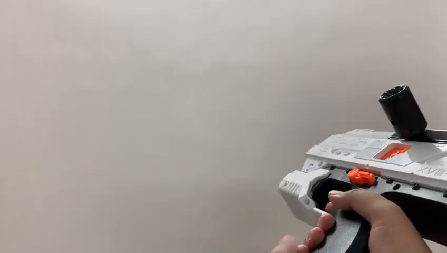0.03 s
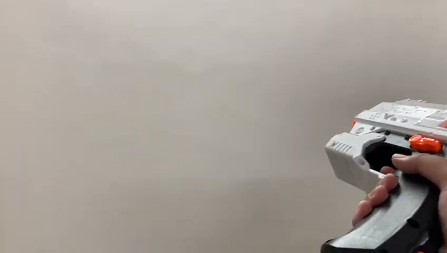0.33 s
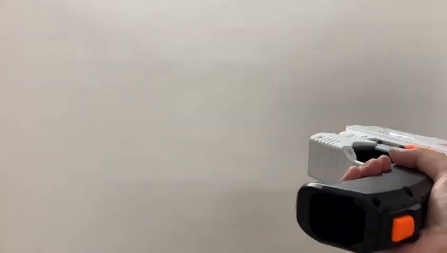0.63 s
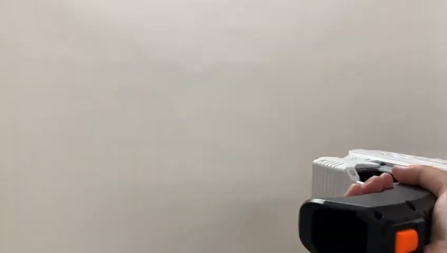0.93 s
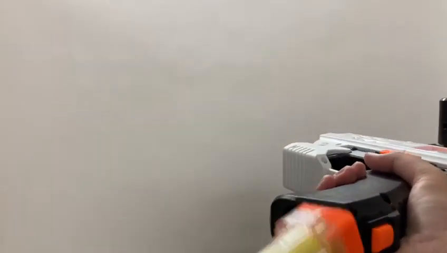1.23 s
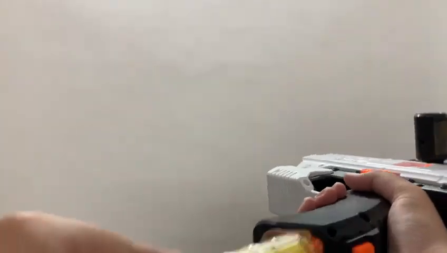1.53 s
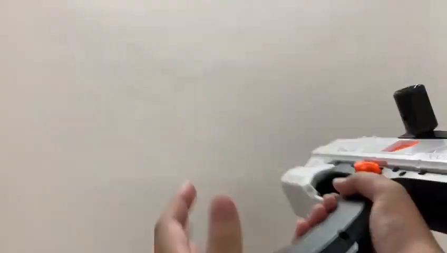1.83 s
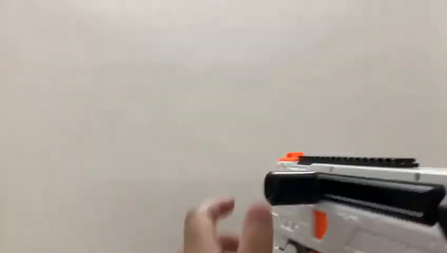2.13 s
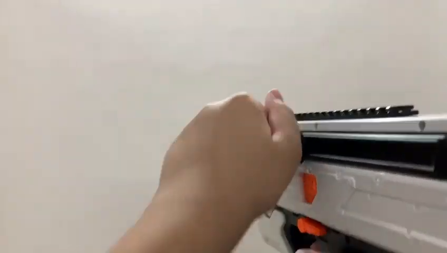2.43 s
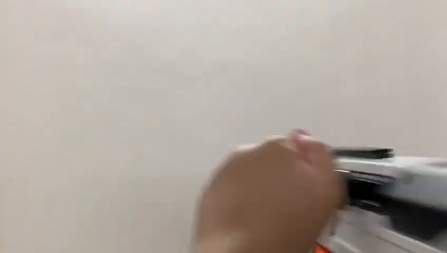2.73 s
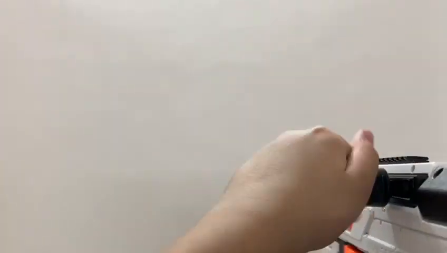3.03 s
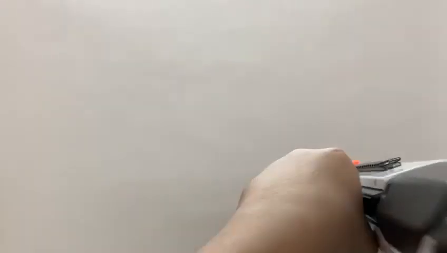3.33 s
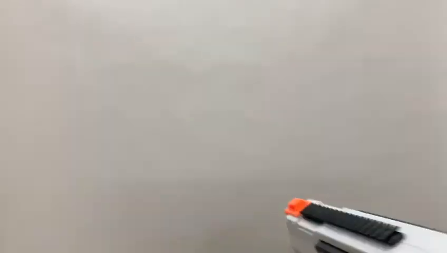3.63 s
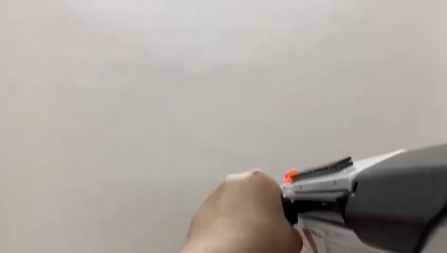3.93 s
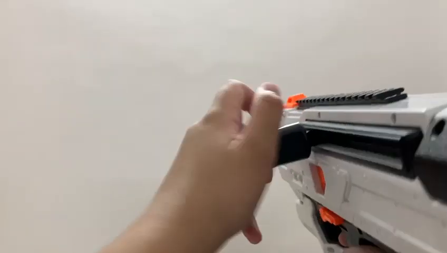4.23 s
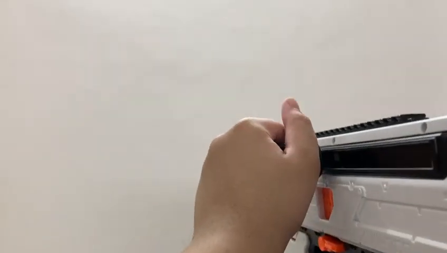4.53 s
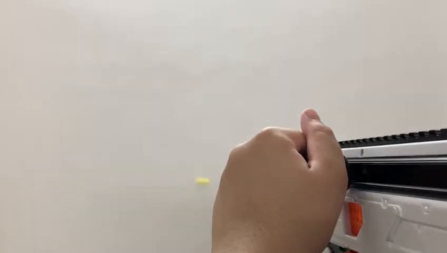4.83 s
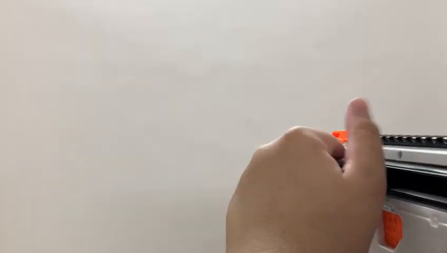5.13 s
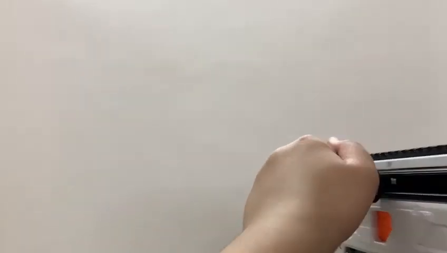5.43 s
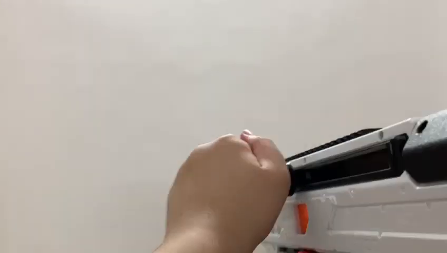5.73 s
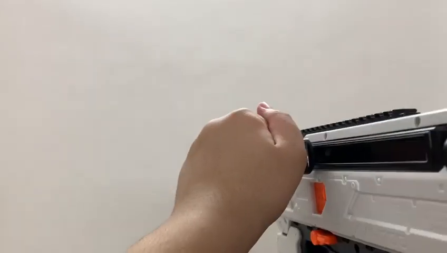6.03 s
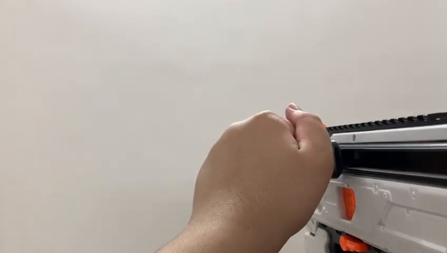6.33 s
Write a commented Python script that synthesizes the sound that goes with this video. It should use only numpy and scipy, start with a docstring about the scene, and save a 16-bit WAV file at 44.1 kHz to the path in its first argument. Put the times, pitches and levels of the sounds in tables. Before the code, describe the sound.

A plastic toy foam blaster is handled close to a phone microphone in a bare room. Its magazine creaks, clicks and clacks home, then the slide is racked back and forward with quick ratcheting snaps. The spring plunger fires with a loud thump, a puff of air and a short rattle. The slide is racked again and a second shot follows, over a faint ventilation rush.

```python
"""A plastic foam blaster is handled close to a phone in a bare, ventilated room. First a magazine creaks
by stick-slip and clacks home; then the slide is racked over its ratchet. At 4.9 s the spring plunger
fires with a thump, a burst of air and a rattle; the slide is racked again, and it fires again at 6.1 s.
Every contact excites the modes of the hollow shell and then the room; the phone's limiter ducks on
the loud clacks and lifts the reverberation as it lets go."""
import sys
import numpy as np
from scipy import signal
from scipy.fft import rfft, irfft
from scipy.io import wavfile
from scipy.ndimage import uniform_filter1d, minimum_filter1d

SR = 44100
rng = np.random.default_rng(int(sys.argv[2]) if len(sys.argv) > 2 else 0)


def to_wav(s):
    """Save 16-bit WAV."""
    ch = np.atleast_2d(s).T  # columns
    pcm = np.round(np.clip(ch, -1, 1) * 32767)  # PCM
    wavfile.write(sys.argv[1], SR, pcm.astype(np.int16))


N = 285768
T = np.arange(N) / SR

# dense modal response of the shell: f/Hz, level/dB, t60/s
SHELL_BANDS = [(60, -11, 0.1), (196, -7, 0.056), (450, 3, 0.067), (670, 4, 0.044), (1076, 3.5, 0.049),
               (1950, 1, 0.047), (3700, 0.5, 0.042), (5840, -1.5, 0.029), (9300, -3, 0.058),
               (12000, -0.5, 0.03)]
# the hard first instant of a click: f/Hz, level/dB, t60/s
CRACK_BANDS = [(500, -17.5, .01), (1500, -8, 0.021), (3720, -2.5, .014), (6960, 0, .013),
               (10900, 2.5, 0.0087)]
# narrow resonances of the pawl and its toothed rail: f/Hz, width/Hz, level/dB
PAWL_RESONANCES = [(1340, 30, -3), (2126, 40, -2), (2500, 44, -2.5), (3680, 41, -0.5), (3850, 45, -2.5),
                   (4700, 60, 3), (5100, 65, 1), (6190, 55, 0.5), (6797, 50, 1.5), (7640, 50, 0)]
# magazine or slide running over its catches: start/s, end/s, initial tooth rate/Hz,
# ratio of each gap to the one before, first tooth/dB, last tooth/dB, rubbing/dB, lead-in scrape/dB
SLIDE_STROKES = [(1.768, 1.787, 117.5, 0.95, -2.5, -12, -16, -17),
                 (2.6197, 2.632, 230.4, 1, -10.5, -11, -21, -36),
                 (2.654, 2.723, 149.9, 1.07, 1.5, -12, -9.5, -10.5),
                 (3.852, 3.924, 78.9, 0.94, -11, -5, -22.5, -21),
                 (5.548, 5.600, 139.9, 1.03, -3, -10.5, -14, -17),
                 (5.7229, 5.759, 135.1, 1, -11, -6.5, -13, -18)]
# magazine or slide reaching a stop:
# t/s, level/dB, body/dB, edge/dB, cavity f/Hz, cavity level/dB, panel f/Hz, lead-in scrape/dB
STOPS = [(1.745, 3.5, -6.5, -6.5, 598, 6.5, 1347, -26), (1.790, 2.5, -7, 0, 607, -1, 945, -19.5),
         (2.607, -6.5, -1.5, -10.5, 466, -3, 1180, -42), (2.7715, -3.5, -3.5, -3.5, 420, 4.5, 1066, -12.5),
         (3.635, -9, 0.5, 3, 562, -7, 1200, -18.5), (3.925, 5, -2, -2, 544, 6.5, 1048, -23),
         (5.761, 1.5, -3, -1, 484, 3, 1016, -18)]
# plunger firings: release t/s, latch/dB, impact t/s, rebound t/s, impact/dB, thump f/Hz, thump/dB
FIRINGS = [(4.8659, 13, 4.8710, 4.8775, 20, 310, 23.5), (6.1323, 12, 6.1393, 6.1432, 17.5, 401, 22)]


def undb(db):
    """Amplitude ratio of a level in decibels."""
    return 10 ** (np.asarray(db) / 20)


def at(hz, points, values):
    """Interpolation on a logarithmic frequency axis."""
    return np.interp(np.log(np.maximum(hz, 1)), np.log(points), values)


def add(track, s, sound):
    """Superposition: a sound joins the track at time s."""
    i = max(int(s * SR), 0)
    track[:, i:i + sound.shape[1]] += sound[:, :max(N - i, 0)]


def swell(start, end, rise_s, fall_s):
    """Trapezoidal envelope: it rises, holds and falls."""
    return np.clip(np.minimum((T - start) / rise_s, (end - T) / fall_s), 0, 1)


def tilt(hz, body_db, edge_db):
    """Spectral tilt of a contact in dB: its body sets the bass, its edge the treble."""
    return at(hz, [600, 1300, 2600, 6000], [body_db, 0, 0, edge_db])


def stereo_noise(size, apart_hz=2100):
    """Spatial coherence: spectra of white noise at two points, alike in the bass, less so higher up."""
    hz = np.fft.rfftfreq(size, 1 / SR)
    mid, side = rfft(rng.standard_normal((2, size)))
    side_share = np.clip(0.066 + 0.83 * hz / (hz + apart_hz), 0, 1)
    return hz, np.sqrt(1 - side_share) * mid + np.sqrt(side_share) * side * np.array([[1], [-1]])


def ring(bands, size=4096, body_db=0, edge_db=0, contact_s=0.0004, t60_scale=1, build_cycles=0.45):
    """Modal overlap: countless modes merge into noise, each band building and dying at its own rate."""
    points, db, t60 = np.transpose(bands)
    hz, noise = stereo_noise(size)
    t = np.arange(size) / SR
    noise = noise * undb(at(hz, points, db) + tilt(hz, body_db, edge_db))
    out = 0
    for band, centre_hz, t60_s in zip(np.eye(len(points)), points, t60 * t60_scale):
        attack = 1 - np.exp(-t / (contact_s + build_cycles / centre_hz))
        decay = np.exp(-np.log(1000) * t / t60_s)
        out = out + irfft(noise * at(hz, points, band), size) * attack * decay
    return out


def knock(hz, t60_s, rise_s=0.0022, size=8192):
    """Damped oscillator: a single mode swells and decays exponentially."""
    t = np.arange(size) / SR
    envelope = (1 - np.exp(-t / rise_s)) * np.exp(-np.log(1000) * t / t60_s)
    return (np.sin(2 * np.pi * hz * t) * envelope)[None]


def resonate(x, modes):
    """Resonance: narrow bands of a sound ring on and are added to it."""
    drive = x + 1e-18
    return x + sum(undb(db) * signal.lfilter(*signal.iirpeak(hz, hz / width, fs=SR), drive)
                   for hz, width, db in modes)


def ventilation():
    """Broadband flow noise: a steady room rush, turned down by the phone's gain after loud clacks."""
    # spectrum of the rush: f/Hz, relative level/dB
    spectrum = [(20, -24.5), (55, -3.5), (130, -4), (270, -0.5), (400, -1.5), (580, -12), (1000, -10),
                (1600, -15.5), (2500, -21.5), (4000, -27), (6000, -37.5), (12000, -43)]
    # preset curve standing for the phone's gain control: t/s, level/dB
    phone_gain = [(0, -36), (1.75, -34.5), (1.9, -43.5), (2.05, -38), (2.2, -35), (2.6, -33.5), (2.8, -43),
                  (4.8, -41.5), (5.6, -40), (6.48, -57)]
    hz, noise = stereo_noise(N)
    air = irfft(noise * undb(at(hz, *np.transpose(spectrum))), N)
    return air / air.std() * undb(np.interp(T, *np.transpose(phone_gain)))


def room(x, tail_db=-44, near_db=-33, build_s=0.0014):
    """Reverberation by convolution: nearby walls fade fast, the diffuse field lasts longer."""
    # diffuse tail: f/Hz, level/dB, t60/s
    tail = [(80.3, -9, 1), (242, -4, 0.98), (600, 1.5, 0.95), (1200, -2, 0.8), (2480, 0, 0.68),
            (4770, -1, 0.68), (7940, -3, 0.55), (12200, -8, 0.57)]
    # early reflections: f/Hz, level/dB, t60/s
    near_walls = [(100, -16, 0.14), (500, -4.5, 0.4), (2010, -5, 0.34), (11000, -4.5, 0.25)]
    response = undb(tail_db) * ring(tail, size=40960) + undb(near_db) * ring(near_walls, size=40960)
    onset = 1 - np.exp(-np.arange(response.shape[1]) / SR / build_s)
    return signal.fftconvolve(x, response * onset, axes=1)[:, :N]


def grip_bumps(centre_hz=82, decay_s=0.01, knocks_per_s=28, jitter_s=0.0028, fade_db_per_s=13):
    """Heavily damped impacts: the settling hand gives low thumps, each weaker than the last."""
    # the hand knocking on the grip: start/s, end/s, first level/dB
    grips = [(1.793, 1.81, -10), (2.094, 2.16, -20.5), (3.24, 3.33, -30), (4.124, 4.345, -23.5)]
    out = np.zeros((2, N))
    t = np.arange(SR // 5) / SR
    envelope = np.exp(-t / decay_s) * (1 - np.exp(-t / 0.00084))
    for start, end, first_db in grips:
        for s in np.arange(start, end, 1 / knocks_per_s):
            hz = centre_hz * np.exp(0.29 * rng.standard_normal())
            thump = undb(first_db - fade_db_per_s * (s - start)) * np.sin(2 * np.pi * hz * t) * envelope
            add(out, s + jitter_s * rng.standard_normal(), thump[None])
    return out


def friction(pressure, slips_per_s, spread_db, body_db, edge_db, t60_s=0.081):
    """Stick-slip friction: tiny random slips feed energy to the shell, where it decays."""
    sizes = undb(spread_db * np.minimum(rng.exponential(size=4096), 3))
    slips = (rng.random(N) < slips_per_s / SR) * np.resize(sizes, N)
    retained = np.exp(-2 * np.log(1000) / (t60_s * SR))
    energy = signal.lfilter([1 - retained], [1, -retained], (pressure * slips / slips.std()) ** 2 + 1e-18)
    points, db, _ = np.transpose(SHELL_BANDS)
    hz, noise = stereo_noise(size=65536)
    shell = irfft(noise * undb(at(hz, points, db) + tilt(hz, body_db, edge_db)))
    return np.sqrt(energy) * shell.take(np.arange(N), axis=1, mode="wrap")


def pre_shot_swell(lead_s=0.018, hiss_db=-26):
    """Amplitude envelope: a faint scraping hiss swells just before each shot."""
    return sum(undb(latch_db + hiss_db) * swell(release - lead_s, impact, lead_s, impact - release) ** 2
               for release, latch_db, impact, *_ in FIRINGS)


def rubs(grab_s=0.0071, release_s=0.015, slack_s=0.063, run_on_s=0.014):
    """Friction noise follows force: bright in a stroke, duller as slack is taken up, with soft rustles."""
    # soft rustling noise; the first row is the fading room tail of a click: start/s, end/s, level/dB
    rustles = [(-.01, 0.1, -26), (0.09, 0.207, -36), (1.477, 1.702, -38), (1.85, 2.163, -36),
               (2.41, 2.575, -43), (2.796, 2.997, -36.5), (3.38, 3.486, -43), (3.525, 3.62, -34.5),
               (3.654, 3.815, -31.5), (4.023, 4.125, -28.5), (5.79, 5.946, -37)]
    sliding = 0
    for start, end, _, _, first_db, last_db, rub_db, _ in SLIDE_STROKES:
        force = undb(rub_db + np.interp(T, [start, end], [0, last_db - first_db]))
        sliding = sliding + force * swell(start, end + run_on_s, grab_s, release_s)
    slack = sum(undb(db) * swell(s - slack_s, s + release_s, slack_s, release_s) ** 2
                for s, *_, db in [*SLIDE_STROKES, *STOPS])
    rustle_level = sum(undb(db) * swell(start, end, grab_s, release_s) for start, end, db in rustles)
    rail = friction(sliding, slips_per_s=450, spread_db=3.5, body_db=-4, edge_db=0, t60_s=0.033)
    scrape = friction(slack + pre_shot_swell(), slips_per_s=800, spread_db=2, body_db=-3, edge_db=-9)
    rustle = friction(rustle_level, slips_per_s=380, spread_db=2.8, body_db=-2, edge_db=-11, t60_s=0.06)
    return resonate(rail, PAWL_RESONANCES) + scrape + rustle


def magazine_creak(start_s=0.1865, end_s=0.223, slip_hz=98, jitter_s=0.00093):
    """Nearly periodic stick-slip: the magazine slips harder as it is pushed into its well."""
    out = np.zeros((2, N))
    for s in np.arange(start_s, end_s, 1 / slip_hz):
        db = np.interp(s, [start_s, end_s], [-21.5, -13.5])
        onset = s + jitter_s * rng.standard_normal()
        add(out, onset, undb(db) * ring(SHELL_BANDS, body_db=1.5, edge_db=-7, contact_s=0.0009))
    return out


def wall_rings():
    """Free vibration: single modes of the thin plastic walls outlast the blow that starts them."""
    # ringing walls: t/s, f/Hz, level/dB, t60/s
    wall_modes = [(1.389, 850, -24, .058), (1.389, 1394, -21.5, .05), (1.389, 3690, -15.5, .025),
                  (1.793, 604, -29, .22), (1.793, 948, -26.5, .3), (5.763, 978, -19.5, .07)]
    out = np.zeros((2, N))
    for s, hz, db, t60_s in wall_modes:
        add(out, s, undb(db) * knock(hz, t60_s, rise_s=0.0004, size=16384))
    return out


def clicks(crack_db=2):
    """Impulse excitation: a crack, then the shell rings; mass brings out bass, hard edges treble."""
    # light parts snapping against the shell, and the plunger bouncing after each shot (4.916 s, 6.182 s): t/s,
    # level/dB, body/dB, edge/dB, t60 ratio
    snaps = [(.2185, -18, 1, -6, 1), (.228, -11.5, 0, -10, .86), (0.2433, -13.5, -9, -1, .6),
             (0.2522, -7, -8, -0.5, .7), (0.257, -13, 1.5, -3.5, .8), (1.3391, -9.5, 5.5, -1.5, 0.72),
             (1.389, -8, 2.5, -1.5, .5), (1.549, -16.5, 5, -12, 0.82), (1.705, -18, -5.5, -7, 0.78),
             (1.758, -3.5, -2, -3, 0.74), (1.7695, 1.5, -3, -8, 0.77), (1.7785, -0.5, -5, -11, .8),
             (2.277, -19.5, 5.5, -5.5, 0.93), (2.4274, -19.5, 3.5, -11.5, 0.92),
             (2.440, -16.5, 4, -11, 0.91), (2.465, -17, -2, -14, 1.46), (2.520, -18.5, 8, -22, 0.8),
             (2.645, -8, -0.5, -6, 0.89), (2.6635, -2, -4.5, -2.5, 0.91), (2.676, -6.5, 3, -0.5, .7),
             (2.696, -8, -4, -3, 0.88), (3.135, -37.5, -5, -3.5, 0.81), (3.356, -37.5, -12.5, -5, .86),
             (3.395, -28.5, -3.5, -14.5, 1), (3.548, -23.5, 8, -9.5, 1.1), (3.8245, -16.5, -2, -19, .9),
             (3.842, -20, 1.5, -11, .86), (3.8807, -4.5, -9, 1, 0.74), (3.898, -3, -8, 1, 0.47),
             (3.9147, -8, -0.5, 1, .7), (4.285, -17.5, 2.5, -14, 0.89), (4.348, -29.5, 12, -8, 1.1),
             (4.424, -32.5, -1.5, -2.5, 1), (4.755, -24, 1, -8.5, 1), (4.916, -5, 2, -9, .7),
             (5.083, -15, 9, -16, 1), (5.212, -23, 14, -7, .86), (5.484, -30, 5, -6.5, .86),
             (5.496, -20, 4, -13, 0.92), (5.502, -17.5, 4.5, -10, 1), (5.514, -14.5, 3, -5.5, 1.4),
             (5.5627, -2.5, -1, -3.5, 0.63), (5.5695, -4.5, -1, -1, 0.55), (5.588, -10, -5, -1, .8),
             (5.6166, -3, -6.5, -10, 0.75), (5.625, -9, -1, -4, 1.2), (5.7355, -3.5, -8, -2, .7),
             (6.182, -4, -3, -7, .6), (6.472, -28.5, 13, 4.5, .86)]
    out = np.zeros((2, N))
    for s, db, body_db, edge_db, t60_scale in snaps:
        add(out, s, undb(db) * ring(SHELL_BANDS, body_db=body_db, edge_db=edge_db, t60_scale=t60_scale))
        add(out, s, undb(db + crack_db) * ring(CRACK_BANDS, size=2048, edge_db=edge_db))
    return out


def ratchet(scatter_db=0.5, shared_power=0.36, crack_db=-2):
    """Impact train: the pawl strikes tooth after tooth at a rate set by the speed of the stroke."""
    out = np.zeros((2, N))
    pawl = ring(SHELL_BANDS, body_db=-9.5, edge_db=2.5, t60_scale=0.76)  # common to every tooth
    for start, end, teeth_hz, gap_ratio, first_db, last_db, *_ in SLIDE_STROKES:
        times = start + np.append(0, np.cumsum(gap_ratio ** np.arange(16))) / teeth_hz
        for s in times[times < end]:
            db = np.interp(s, [start, end], [first_db, last_db]) + scatter_db * rng.standard_normal()
            tooth = ring(SHELL_BANDS, body_db=-2, edge_db=-1.5, t60_scale=0.67)
            add(out, s, undb(db) * (np.sqrt(shared_power) * pawl + np.sqrt(1 - shared_power) * tooth))
            add(out, s, undb(db + crack_db) * ring(CRACK_BANDS, size=2048, edge_db=-4.5))
    return resonate(out, PAWL_RESONANCES)


def clacks(seat_s=0.004, seat_db=1, hollow_db=-9, panel_db=-7):
    """Two-stage impact: a part meets its stop edge first, then seats, exciting cavity and panel modes."""
    out = np.zeros((2, N))
    for s, db, body_db, edge_db, cavity_hz, cavity_db, panel_hz, _ in STOPS:
        contact = dict(edge_db=edge_db, contact_s=0.00058, t60_scale=0.76)
        edge = ring(SHELL_BANDS, body_db=body_db, **contact)
        face = ring(SHELL_BANDS, body_db=body_db + 6, **contact)  # heavier and duller
        hollow = knock(cavity_hz, t60_s=0.026) + undb(panel_db) * knock(panel_hz, t60_s=0.04)
        add(out, s, undb(db) * edge)
        add(out, s + seat_s, undb(db + seat_db) * face)
        add(out, s + seat_s, undb(cavity_db + hollow_db) * hollow)
    return out


def spring_rattle(hits_per_s=32, end_s=0.4, start_db=-6, fade_db_per_s=55, centre_hz=620):
    """Decaying irregular impacts: after a shot the slack spring slaps its tube at scattered pitches."""
    out = np.zeros((2, N))
    for _, _, impact, *_ in FIRINGS:
        for slot in np.arange(0.06, end_s, 1 / hits_per_s):
            wait = slot + rng.random() / hits_per_s
            db = start_db - fade_db_per_s * wait + 2 * rng.standard_normal()
            hz = centre_hz * np.exp(0.3 * rng.standard_normal())
            add(out, impact + wait, undb(db) * knock(hz, t60_s=0.037))
            add(out, impact + wait, undb(db - 3) * ring(SHELL_BANDS, edge_db=-15, t60_scale=0.43))
    return out


def part_resonances(contacts):
    """Forced vibration: magazine, catch and slide each add a resonance while they are worked."""
    # worked parts: start/s, end/s, f/Hz, width/Hz, level/dB
    worked_parts = [(0.173, 0.25, 1500, 380, 7), (.243, .27, 2700, 300, -4),
                    (0.253, 0.262, 3650, 600, -1.5), (1.335, 1.36, 1200, 140, -3),
                    (1.736, 1.823, 590, 110, -9), (2.618, 2.72, 520, 140, -5),
                    (2.663, 2.717, 3798, 300, -8), (2.77, 2.8, 429, 110, -9), (3.62, 3.66, 1190, 130, 0.5),
                    (3.85, 3.94, 545, 110, -9), (3.924, 3.944, 2250, 219.7, -7),
                    (5.542, 5.64, 455, 70, 0.5), (5.54, 5.581, 4420, 1500, -13), (5.72, 5.78, 495, 60, -6),
                    (5.73, 5.767, 4730, 700, -9)]
    out = contacts
    for start, end, hz, width, db in worked_parts:
        struck = contacts * ((T >= start) & (T < end))
        out = out + resonate(struck, [(hz, width, db)]) - struck
    return out


def slam(push_s, rise_s=0.000053, relax_s=0.0017):
    """Pressure pulse of zero net impulse: the plunger's steep blow, then a slow swing back."""
    t = np.arange(2048) / SR
    pulse = np.exp(-t / push_s) - np.exp(-t / rise_s)
    swing = t * np.exp(-t / relax_s)
    return (swing * pulse.sum() / swing.sum() - pulse)[None] / pulse.max()


def shots(puff_db, hollow_db, rebound_db=-1, chatter_s=0.0058, chatter_db=3, fade_db_per_hit=6):
    """Release of stored energy: the latch snaps, the plunger slams and rebounds, air thumps and bursts."""
    # air bursting from the barrel: f/Hz, level/dB, t60/s
    puff = [(40, 13, 0.11), (130, 6, 0.052), (300, 16, 0.038), (605, 7.5, 0.056), (1210, 14, 0.035),
            (2430, 10.5, 0.031), (5060, -8.5, 0.062), (10960, 3, 0.074)]
    # resonances of cylinder, barrel and spring: f/Hz, width/Hz, level/dB
    barrel_modes = [(162, 45, 0), (307, 82, 1.5), (495.3, 149, 2), (780, 120, 4.5), (1700, 170, -5),
                    (2260, 330, 3.5), (3140, 150, 1)]
    shell, barrel, thump = np.zeros((3, 2, N))
    for release, latch_db, impact, rebound, impact_db, thump_hz, thump_db in FIRINGS:
        add(shell, release, undb(latch_db) * ring(SHELL_BANDS, edge_db=-2, t60_scale=0.72))
        add(barrel, impact, undb(impact_db) * slam(push_s=0.00013))
        add(barrel, rebound, undb(impact_db + rebound_db) * slam(push_s=0.00054, rise_s=0.00031))
        add(barrel, impact, undb(impact_db + puff_db) * ring(puff))
        add(thump, rebound - 1 / thump_hz, -undb(thump_db + hollow_db) * knock(thump_hz, t60_s=0.021))
        for hit in range(6):  # loose parts chatter to rest
            s = impact + 0.001 + chatter_s * (hit + 0.11 * rng.standard_normal())
            db = latch_db + chatter_db - fade_db_per_hit * hit
            add(shell, s, undb(db) * ring(SHELL_BANDS, body_db=-6, edge_db=5, t60_scale=0.62))
    return shell, resonate(barrel, barrel_modes) + thump


def blaster(contacts, shot_db, puff_db, hollow_db):
    """Radiation in one direction: contacts and latch sound through the shell, shots from the barrel."""
    # clearest resonances of the shell: f/Hz, width/Hz, level/dB
    shell_modes = [(440, 110, -10), (543, 110, -12), (1006, 110, -9), (1180, 59, -12), (2303, 130, -16.5),
                   (4150, 660, -8.5), (6940, 1000, -3.5)]
    latch, barrel = shots(puff_db, hollow_db)
    shell = resonate(contacts + undb(shot_db) * latch, shell_modes)
    return undb(-1.5) * shell + undb(shot_db) * barrel


def scene(left_lag_samples=2, left_db=1.03):
    """Direct and reverberant fields add; the blaster's sound reaches the right channel first."""
    air = ventilation()
    handling = clicks() + clacks() + magazine_creak() + ratchet() + rubs()
    contacts = part_resonances(handling) + wall_rings() + spring_rattle()
    left, right = blaster(contacts, shot_db=0, puff_db=-10, hollow_db=2)
    direct = np.array([undb(left_db) * np.pad(left, (left_lag_samples, 0))[:N], right])
    # directivity: the muzzle sends the far wall more shot and air, less hollow thump
    forward = blaster(contacts, shot_db=2, puff_db=-7, hollow_db=-12)
    return direct + undb(-5) * room(direct) + undb(-2.5) * room(forward) + grip_bumps() + air


def microphone_pair(x):
    """Interference: near 9 kHz the two microphones are in opposite phase, so their sum dips."""
    # response of the pair: f/Hz, sum/dB, difference/dB
    response = [(1000, 0, -1.5), (4300, 0, -2), (5700, 0, -6), (7000, 0, -1), (8200, 0, 3), (8900, -14, 6),
                (9300, -22, 6), (9800, -12, 5), (10500, 2, -4), (11300, 1, -8), (12000, -5, -13)]
    hz = np.fft.rfftfreq(N, 1 / SR)
    points, sum_db, difference_db = np.transpose(response)
    left, right = rfft(x)
    mid = (left + right) / 2 * undb(at(hz, points, sum_db))
    side = (left - right) / 2 * undb(at(hz, points, difference_db))
    return irfft(np.array([mid + side, mid - side]), N)


def limiter(x, ceiling_db=-11, release_db_per_s=78, hold_s=0.075, window_s=0.0024):
    """Gain control: when short-term power passes the ceiling, gain drops, holds, then climbs steadily."""
    window, hold = int(window_s * SR), int(hold_s * SR)
    power = np.maximum(uniform_filter1d(np.mean(x ** 2, axis=0), window), 1e-12)
    needed_db = np.minimum(ceiling_db - 10 * np.log10(power), 0)
    held_db = minimum_filter1d(needed_db, hold, origin=(hold - 1) // 2)
    gain_db = np.minimum.accumulate(held_db - release_db_per_s * T) + release_db_per_s * T
    return x * undb(uniform_filter1d(gain_db, window))


def record(dry, low_hz=34, top_hz=11700, overload_db=16, clip_level=0.7):
    """Saturation and band limiting: the phone rounds hard blows, cuts deep bass, limits, cuts the top."""
    highpass = signal.butter(2, low_hz, "highpass", fs=SR, output="sos")
    lowpass = signal.ellip(8, 0.3, 70, top_hz, fs=SR, output="sos")
    rounded = undb(overload_db) * np.tanh(microphone_pair(dry) / undb(overload_db))
    limited = limiter(signal.sosfilt(highpass, rounded))
    return signal.sosfilt(lowpass, np.clip(limited, -clip_level, clip_level))


dry = scene()
out = record(dry)
to_wav(out)
```